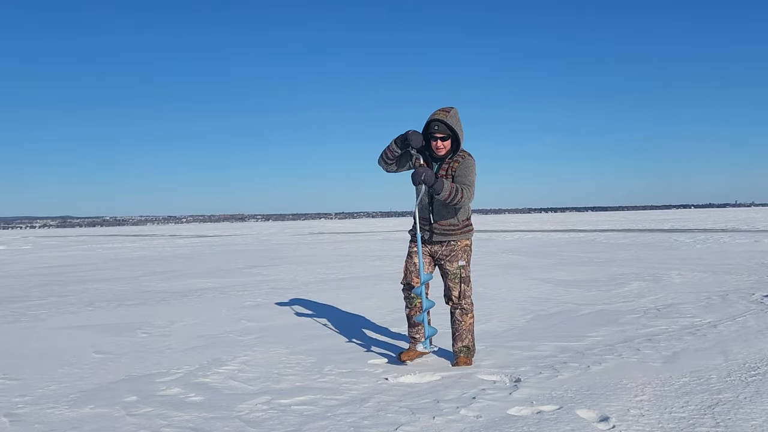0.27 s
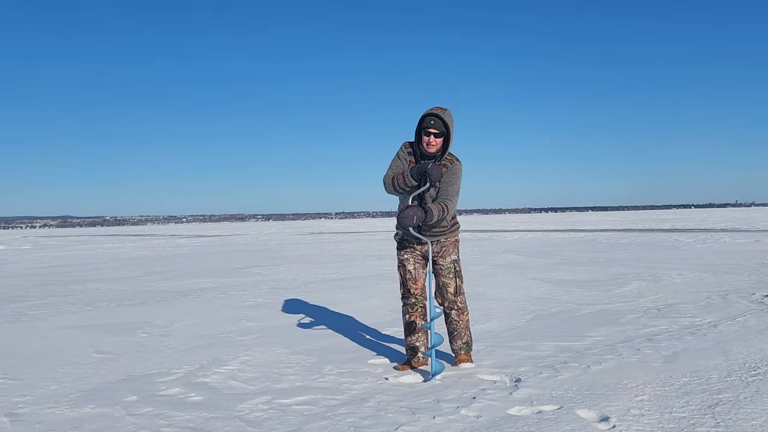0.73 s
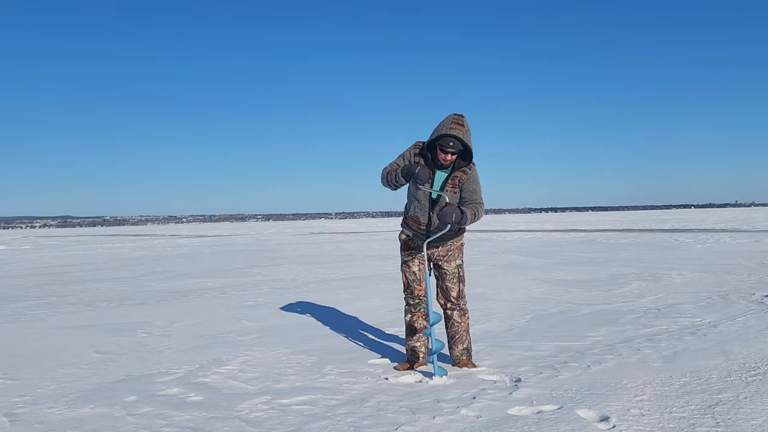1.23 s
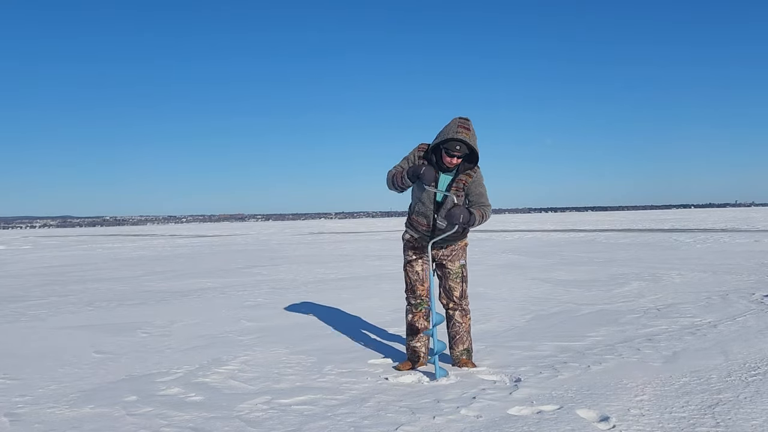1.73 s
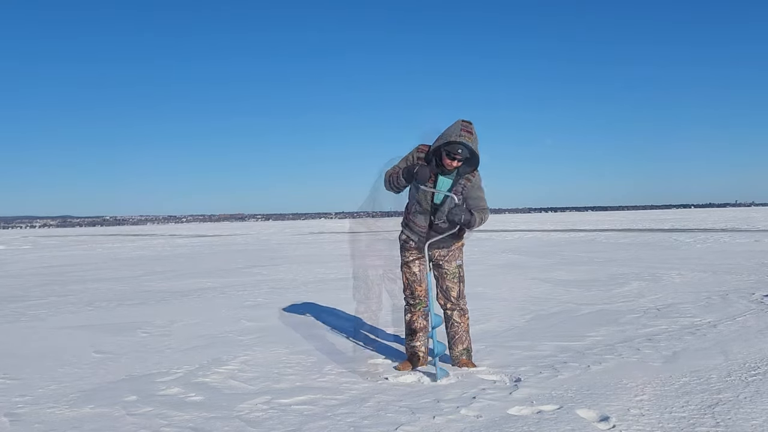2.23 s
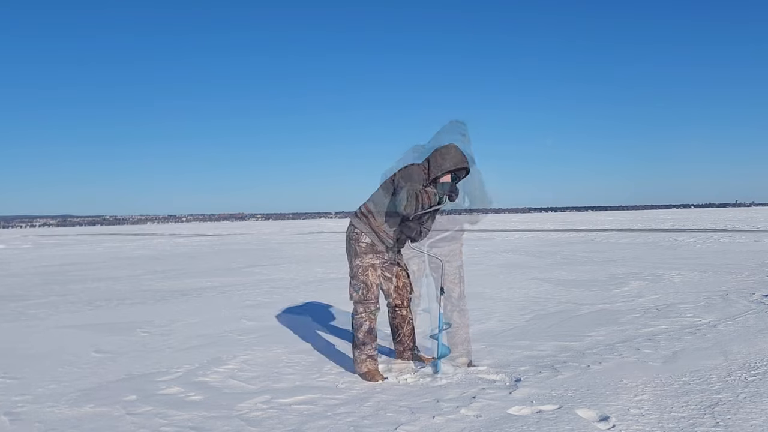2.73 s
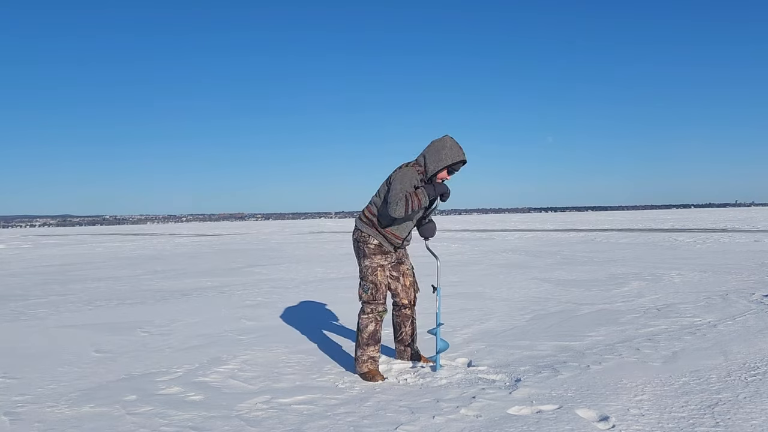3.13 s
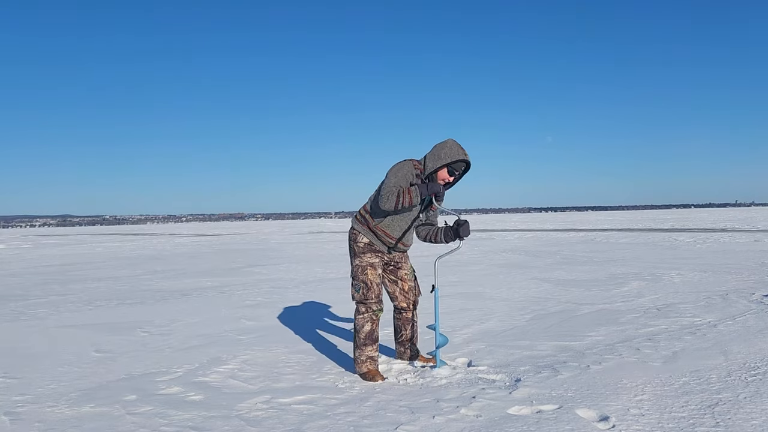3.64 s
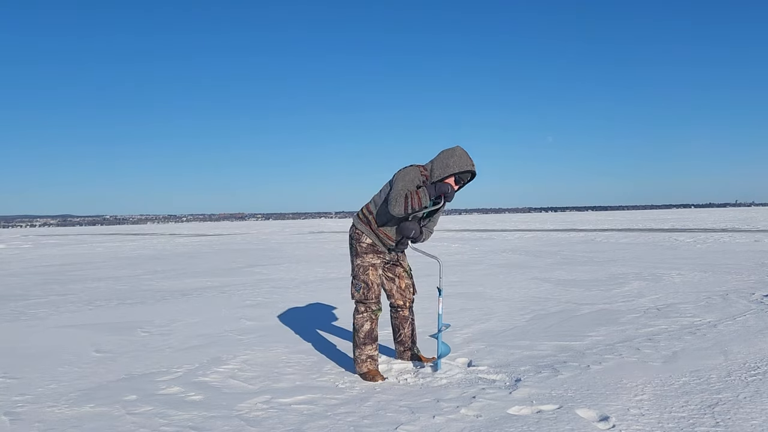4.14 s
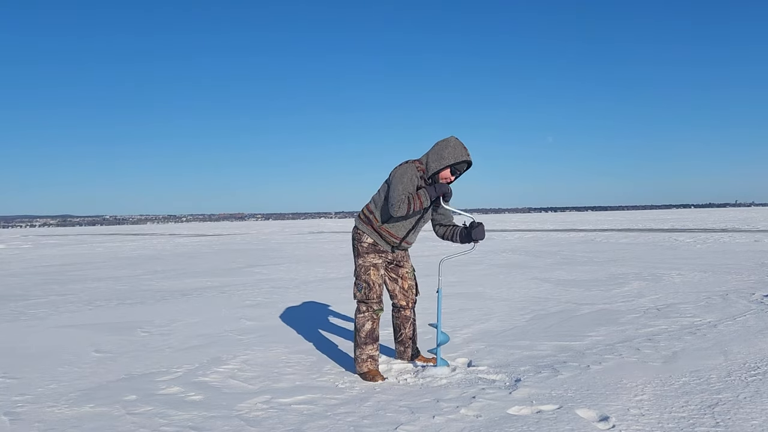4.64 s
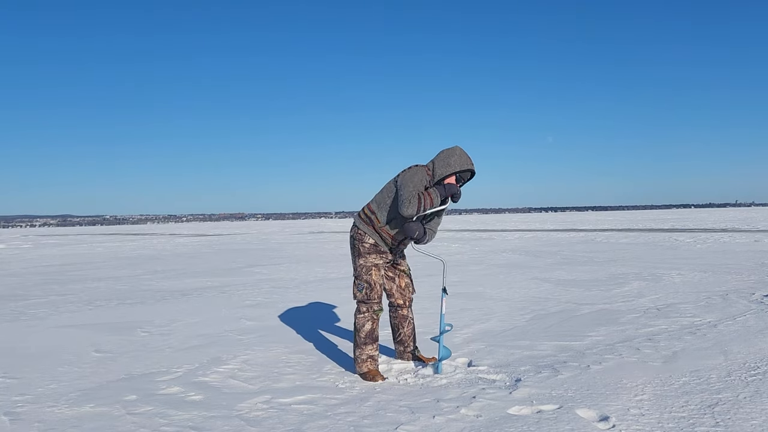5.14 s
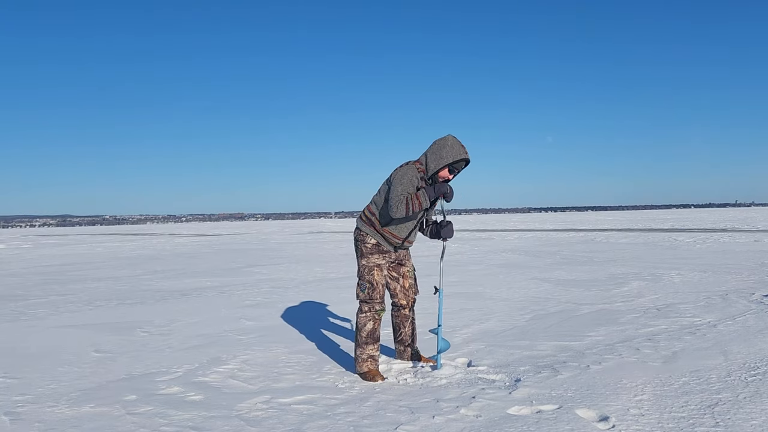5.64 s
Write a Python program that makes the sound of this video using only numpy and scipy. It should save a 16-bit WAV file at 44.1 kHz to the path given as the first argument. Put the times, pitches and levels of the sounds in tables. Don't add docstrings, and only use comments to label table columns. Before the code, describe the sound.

A hand auger scrapes and grinds into ice in uneven pushes, cracking sharply, while low wind gusts thump and flutter on the microphone.

```python
import sys
import numpy as np
from scipy import signal
from scipy.fft import rfft, irfft, next_fast_len
from scipy.io import wavfile
from scipy.ndimage import uniform_filter1d, map_coordinates

SR = 44100
rng = np.random.default_rng(int(sys.argv[2]) if len(sys.argv) > 2 else 0)


def log_audio(samples):
    frames = np.atleast_2d(samples).T
    limited = np.clip(frames, -1, 1)
    pcm = np.round(limited * 32767).astype(np.int16)
    wavfile.write(sys.argv[1], SR, pcm)


def attenuation_scalar(level_db):
    decades = np.asarray(level_db, float) / 20
    return 10 ** decades


N = 259308
TIME = np.arange(N) / SR
BURST_TIME = TIME[:SR // 10]


def unit(x):
    return x / np.sqrt(np.mean(x ** 2) + 1e-20)


def noise_pair():
    return rng.standard_normal((2, N))


def along(points, hz):
    f, v = np.transpose(points)
    return np.interp(np.log(hz + 1), np.log(f + 1), v)


def closed(points, hz):
    return attenuation_scalar(along(points, hz)) * (hz >= points[0][0]) * (hz <= points[-1][0])


def curves(rows):
    s, *columns = np.transpose(rows)
    return [np.interp(TIME, s, column) for column in columns]


def wobble(rate):
    knots = rng.standard_normal(int(N * rate / SR) + 4)
    return map_coordinates(knots, [TIME * rate])


def filtered(x, response):
    m = next_fast_len(N + SR // 2)
    return irfft(rfft(x, m) * response(np.fft.rfftfreq(m, 1 / SR)), m)[..., :N]


def coloured(x, spectrum):
    return filtered(x, lambda hz: closed(spectrum, hz))


# time_s, deep_share (0 to 1)
SCENE_CHANGE = [
    (2.3, 0.38),
    (2.6, 0.87),
]
# pitch_hz, width_hz, lift_db
BLADE_RING = [
    (7190, 30, 5),
]


def auger():
    hiss_db, grind_db, hollow_db = effort()
    chatter_db = 0.3 * wobble(14) + 0.8 * wobble(45) + 0.5 * wobble(160)
    bite = unit(attenuation_scalar(chatter_db) * (1 + 0.33 * chips(rate=180, spread_db=2.8, life_s=0.002)))
    judder = attenuation_scalar(0.6 * wobble(30))
    crack_hiss, crack_grind = cracks()
    deep_share = np.clip(curves(SCENE_CHANGE)[0], 0, 1)
    grind, hollow = grinding(deep_share)
    sound = shaving_hiss(deep_share) * (attenuation_scalar(hiss_db) * bite + crack_hiss)
    sound += grind * (attenuation_scalar(grind_db) * bite * judder + crack_grind)
    sound += hollow * (attenuation_scalar(hollow_db) * np.sqrt(bite) * judder + 0.21 * deep_share * crack_grind)
    return filtered(sound, lambda hz: steel(hz, BLADE_RING))


# peak_s, half_length_s, hiss_db, grind_over_hiss_db
SHALLOW_PUSHES = [(0.03, .06, -63, -4), (0.19, 0.052, -63, -4), (0.39, 0.027, -59.5, -2),
                  (0.43, 0.016, -45, -4), (0.5, 0.053, -58.5, -3), (0.62, 0.065, -82, 6),
                  (0.78, 0.081, -53, -6.5), (1.02, 0.099, -49.5, -4.5), (1.2, 0.14, -54, -5.5),
                  (1.47, .12, -45.5, -7.5), (1.72, 0.17, -51, -6.5), (1.93, 0.084, -47.5, -11.5),
                  (2.13, 0.15, -51, -4.5)]
# peak_s, half_length_s, hiss_db, grind_over_hiss_db, hollow_over_hiss_db
DEEP_HOLE_PUSHES = [(2.432, 0.043, -45.5, -2, -8.5), (2.574, 0.041, -52, -21, -0.5),
                    (2.647, 0.053, -43.5, -1, -15), (2.747, 0.046, -49, 0, -2),
                    (2.949, 0.055, -42, 1.5, -11), (3.045, 0.14, -48, -3.5, -9),
                    (3.443, 0.0099, -40, 3, -30), (3.56, 0.27, -44.5, -2.5, -9.5),
                    (3.73, 0.028, -41.5, -2.5, -7), (3.815, 0.028, -50.5, 6.5, 3),
                    (3.93, 0.058, -43.5, -1, -9), (4.114, 0.057, -50, -6, -12),
                    (4.192, 0.022, -48.5, 3, -8), (4.282, 0.089, -58.5, 4.5, -1.5),
                    (4.471, 0.052, -49.5, -4.5, -7), (4.659, 0.1, -46, -2.5, -7.5),
                    (4.84, 0.054, -43, -5, -9.5), (4.933, 0.057, -51.5, 5.5, -3.5),
                    (5.06, 0.062, -45, -0.5, -4.5), (5.189, 0.075, -42, -1, -12),
                    (5.354, 0.091, -56.5, -3, -3.5), (5.625, 0.067, -46.5, -4, -10.5),
                    (5.76, 0.061, -45, -3.5, -15), (5.88, 0.062, -44, 4, -6.5)]
# peak_s, half_length_s,
# hiss_db, grind_over_hiss_db, hollow_over_hiss_db
SLIPS = [
    (0.28, 0.09, -91, 10, 5),
    (3.17, 0.017, -68.5, -1, -11),
    (3.405, 0.0059, -79, -18, -5),
    (3.428, 0.0077, -69, -3, -1),
]
# stop_s, restart_s, drop_db
STICKS = [(0.219, 0.344, 39), (0.35, 0.368, 10), (0.54, 0.571, 20), (2.475, 2.534, 10.5),
          (2.768, 2.778, 20), (2.776, 2.88, 23), (2.879, 2.9, 20), (2.901, 2.917, 25), (3.051, 3.439, 40),
          (4.096, 4.172, 3), (4.75, 4.828, 2.5), (5.443, 5.463, 10), (5.466, 5.53, 25), (5.527, 5.558, 11)]


def effort():
    fade_s, catch_s = 0.044, 0.0041
    drop_db = np.zeros(N)
    for stop, restart, db in STICKS:
        stuck = np.minimum((TIME - stop) / fade_s, (restart - TIME) / catch_s)
        drop_db += db * np.clip(stuck, 0, 1)
    pushing = swells(SHALLOW_PUSHES + DEEP_HOLE_PUSHES) * attenuation_scalar(-2 * drop_db)
    return 10 * np.log10(pushing + swells(SLIPS))


def swells(rows):
    coarse = TIME[::16]
    power = np.full((3, len(coarse)), 1e-11)
    for s, half, db, grind_db, *hollow_db in rows:
        levels = db + np.array([0, grind_db, *(hollow_db or [-40])])
        power += attenuation_scalar(2 * levels)[:, None] * np.exp(-((coarse - s) / half) ** 2)
    return np.repeat(power, 16, axis=1)[:, :N]


def chips(rate, spread_db, life_s):
    chance, size = rng.random((2, N))
    sizes = (chance < rate / SR) * attenuation_scalar(-spread_db * np.log(size + 0.023))
    return signal.lfilter([1], [1, -np.exp(-1 / (life_s * SR))], sizes)


# start_s, peak_db, grind_over_hiss_db
ICE_CRACKS = [(0.0, -36, 4.5), (0.077, -59, 15), (0.3507, -45, -12), (0.42, -42, -11), (0.4305, -34, 4.5),
              (0.4486, -20.5, -5.5), (0.574, -51, -12), (0.627, -46, -19), (0.642, -59, -15),
              (2.414, -36, -6), (2.5344, -31.5, 5.5), (2.626, -32, -7), (2.669, -34, 11.5),
              (2.781, -32.5, 1.5), (2.881, -20.5, 0.5), (2.914, -31, 1), (2.898, -37, 7), (2.953, -32, 4),
              (2.959, -37, 6), (2.9875, -29, -17), (3.021, -25.5, 6.5), (2.81, -45, -19), (3.146, -63, 6),
              (3.399, -64, -21), (3.439, -32, -15), (3.444, -22.5, -4), (3.4438, -22, -9),
              (3.5642, -23, -4.5), (3.628, -38, 7), (3.729, -32, -3), (3.769, -46, 15), (3.824, -30, -4),
              (3.891, -37, -12), (3.905, -23.5, -3), (3.95, -43, 11), (4.162, -36, -4), (4.325, -38, 3),
              (4.31, -39, 3), (4.345, -42, 11.5), (4.38, -43.5, 12), (4.511, -39, -5), (4.566, -47, -6),
              (4.635, -32, -6), (4.7, -38, -8), (4.7236, -29, -1.5), (4.8272, -30, -10),
              (4.977, -20.5, -2.5), (4.982, -38, -7), (5.204, -33, 0), (5.307, -34, 0), (5.335, -43, -5),
              (5.4, -43, -1), (5.407, -48, 8), (5.436, -49, 8), (5.477, -52.5, 12), (5.533, -36.5, 3.5),
              (5.8425, -24.5, -3)]


def cracks():
    rise_s, hold_s, t60_s = 0.0011, 0.0016, 0.021
    t = BURST_TIME
    gain = np.zeros((2, N + len(t)))
    shape = np.clip(np.minimum(t / rise_s, attenuation_scalar(-60 * (t - hold_s) / t60_s)), 0, 1)
    for s, db, grind_db in ICE_CRACKS:
        start = round(s * SR)
        gain[:, start:start + len(t)] += attenuation_scalar([[db - 10.5], [db - 12.5 + grind_db]]) * shape
    return gain[:, :N]


# pitch_hz, level_db (per Hz)
SHALLOW_HISS = [(1710, -33), (2900, -13.5), (3400, -13), (4390, -6.5), (4870, -5), (5850, -8.5),
                (7630, -2.5), (8540, -6), (9490, -3), (10300, -11), (12400, -15.5), (14600, -10),
                (15500, -26)]
# pitch_hz, level_db (per Hz)
DEEP_HISS = [(1900, -27), (2700, -6), (3010, -8.5), (3500, -1), (4220, -5), (5700, -3.5), (6900, -4),
             (7200, -3.5), (8450, -4.5), (9780, -5.5), (10800, -14.5), (11900, -15), (14700, -12),
             (15500, -10.5)]
# time_s, pitch_hz, lift_db
HIGH_RESONANCE = [(2.55, 4070, 0.5), (2.6, 4150, 11.5), (2.64, 4280, 11), (2.7, 4580, 10.5), (2.8, 4270, 1),
                  (2.93, 4450, 10), (3.0, 4160, 0.5), (3.6, 4100, 4), (4.2, 4700, 3.5), (4.48, 4150, 3.5),
                  (4.77, 4600, 0), (4.85, 5100, 6.5), (4.95, 4300, 9.5), (5.09, 4330, 4.5), (5.88, 3950, 5)]
# time_s, pitch_hz, lift_db
ECHO_DIP = [
    (0.9, 3100, -5),
    (1.3, 2700, -7),
    (1.7, 2780, -6),
    (2.2, 3050, -7.5),
    (2.45, 3000, 0),
]


def shaving_hiss(deep_share):
    streaks = patchy(3.18, size=512, bins=2, frames=14)
    fine = filtered(ridge(streaks, (HIGH_RESONANCE, 380), (ECHO_DIP, 220)), steel)
    shallow = unit(filtered(fine, lambda hz: attenuation_scalar(along(SHALLOW_HISS, hz)) * (hz > 2000)))
    deep = unit(filtered(fine, lambda hz: attenuation_scalar(along(DEEP_HISS, hz)) * (hz > 2000)))
    return (1 - deep_share) * shallow + deep_share * deep


# time_s, pitch_hz, lift_db
BLADE_SONG = [(0.9, 1940, 1.5), (1.0, 2050, 8.5), (1.08, 1910, 13.5), (1.14, 2050, 17), (1.2, 2060, 9.5),
              (1.3, 1940, 2.5), (1.33, 1800, 15), (1.4, 2110, 15.5), (1.48, 1790, 9), (1.54, 1900, 2),
              (1.6, 1980, 17), (1.65, 2230, 11.5), (1.72, 1940, 9.5), (1.8, 2170, 13.5), (1.84, 1900, 0),
              (1.9, 2010, 17), (2.02, 1505, 4), (2.14, 2150, 8), (2.3, 1710, 0.5), (2.4, 1910, 5.5),
              (2.65, 1710, 3.5), (3.041, 1470, 4), (3.49, 1490, 6.5), (3.58, 1370, 6), (3.63, 1840, 7.5),
              (3.7, 1450, 0), (3.78, 1740, 8.5), (3.85, 1810, 3.5), (3.92, 1620, 3), (3.99, 1300, 5),
              (4.08, 1390, 4), (4.45, 1450, 9), (4.7, 1370, 2), (4.82, 1790, 4), (4.95, 1710, 4.5),
              (5.1, 2050, 4), (5.22, 2260, -3), (5.3, 1500, 6), (5.73, 1476, 10), (5.88, 1690, -13)]
# time_s, pitch_hz, lift_db
FLIGHT_SONG = [(0.9, 1700, 1), (1.1, 1400, 4), (1.3, 1750, 0.5), (1.45, 1590, 3), (1.58, 1460, 10),
               (1.64, 1400, -3), (1.78, 1265, 13.5), (1.9, 1520, -4), (1.96, 1400, 9), (2.08, 1470, 3.5),
               (2.2, 1300, 0), (2.5, 888, 4), (3.7, 870, -7), (3.78, 1000, 9), (3.86, 873, -2.5),
               (4.3, 860, -5), (4.75, 870, -17.5), (4.88, 835, 11), (5.1, 880, -2.5), (5.25, 1310, 3.5),
               (5.45, 1400, 3.5), (5.88, 900, -0.5)]
# pitch_hz, level_db (per Hz)
SHALLOW_GRIND = [(800, -25), (920, -26), (1000, -4.5), (1240, -10), (1400, -2), (1620, -7.5), (2040, -5.5),
                 (2450, -1.5), (2750, -10), (3100, -36)]
# pitch_hz, level_db (per Hz)
DEEP_GRIND = [(560, -50), (950, -5.5), (1150, -0.5), (1300, 1), (1700, -2.5), (1820, -1), (2080, 2),
              (3000, -11.5), (3900, -12), (6600, -120)]
# pitch_hz, level_db (per Hz)
HOLE_AIR = [(440, -18.5), (540, -7.5), (610, 2.5), (680, -1.5), (760, -8.5), (870, -1), (1000, -23.5),
            (1100, -20)]


def grinding(deep_share):
    rough = patchy(3.0, size=2048, bins=2, frames=5)
    rough = filtered(ridge(rough, (BLADE_SONG, 230), (FLIGHT_SONG, 110)), steel)
    shallow = unit(coloured(rough, SHALLOW_GRIND))
    deep = unit(coloured(rough, DEEP_GRIND))
    hollow = unit(coloured(0.82 * unit(rough) + 0.6 * noise_pair(), HOLE_AIR))
    return (1 - deep_share) * shallow + deep_share * deep, hollow


def patchy(depth_db, size, bins, frames):
    z = signal.stft(rng.standard_normal((2, N + size)), nperseg=size)[2]
    field = uniform_filter1d(rng.standard_normal(z.shape[1:]), bins, 0)
    field = uniform_filter1d(field, frames, 1)
    return unit(signal.istft(z * attenuation_scalar(depth_db * unit(field)), nperseg=size)[1][:, :N])


def ridge(pair, *tracks):
    hz, t, z = signal.stft(pair, SR, nperseg=1024)
    for track, width_hz in tracks:
        s, centre, lift_db = np.transpose(track)
        offset = (hz[:, None] - np.interp(t, s, centre)) / width_hz
        z = z * attenuation_scalar(np.interp(t, s, lift_db) * np.exp(-offset ** 2))
    return signal.istft(z, nperseg=1024)[1][:, :N]


# pitch_hz, width_hz, lift_db (over the ice)
STEEL_MODES = [(615, 110, 3), (800, 29, 4.5), (1400, 52, 1), (1710, 21, 6.5), (1940, 49, 1), (2280, 15, 2),
               (4360, 79, 3), (6900, 33, -3.5), (7820, 94, 5.5), (9700, 80, -2), (14400, 34, 3.5)]


def steel(hz, modes=STEEL_MODES):
    gain = np.ones(len(hz), complex)
    for centre, width, db in modes:
        damping = 1j * hz * width
        gain += (attenuation_scalar(db) - 1) * damping / (centre ** 2 - hz ** 2 + damping)
    return gain


# start_s, peak_db
SPLINTER_TICKS = [(0.3484, -64), (2.4138, -16.5), (2.455, -44), (2.6266, -39), (2.883, -41), (3.447, -42),
                  (3.4891, -42), (4.7233, -37), (4.855, -31), (5.1294, -26), (5.5729, -35), (5.8263, -32),
                  (5.8413, -44)]
# pitch_hz, level_db (per Hz)
SPLINTER_COLOUR = [(5500, -35), (7500, 4.5), (9000, 6), (11000, -11), (13000, -10), (16400, -5)]


def ticks():
    t60_s, rise_s = 0.012, 0.0006
    t = BURST_TIME
    gain = np.zeros(N + len(t))
    for s, db in SPLINTER_TICKS:
        start = round(s * SR)
        gain[start:start + len(t)] += attenuation_scalar(db - 9.5 - 60 * t / t60_s) * np.minimum(t / rise_s, 1)
    return gain[:N] * unit(coloured(noise_pair(), SPLINTER_COLOUR))


# start_s, peak_db, pitch_hz
STEEL_PINGS = [(0.349, -62, 1560), (0.349, -58, 3600), (0.378, -58, 1960), (0.378, -51, 3700),
               (3.567, -39, 1830), (0.431, -37, 1345), (0.453, -40, 1940), (0.452, -45, 1350),
               (0.45, -27.5, 4700), (2.535, -48, 2000), (2.668, -44, 1500), (2.955, -36, 1530),
               (2.986, -42, 3980), (3.02, -33.5, 1400), (3.441, -36, 1400), (3.443, -45, 1916),
               (3.735, -38, 1340), (3.905, -35.5, 1560), (3.945, -36, 1670), (4.83, -46, 4900),
               (4.976, -36, 4100), (4.977, -42, 1970), (5.203, -37.5, 1400), (5.203, -46, 4600),
               (5.25, -36, 1400)]


def pings():
    cycles, rise_s, spacing = 74, 0.00072, 0.046
    t = BURST_TIME
    out = np.zeros((2, N + len(t)))
    phases = rng.random((len(STEEL_PINGS), 2, 2, 1))
    for (s, db, hz), turn in zip(STEEL_PINGS, phases):
        detune = np.array([[1 - spacing / 2], [1 + spacing / 2]])
        modes = np.sin(2 * np.pi * (hz * t * detune + turn)) * [[1], [.6]]
        fade = attenuation_scalar(db - 60 * t * hz / cycles) * (1 - np.exp(-t / rise_s))
        start = round(s * SR)
        out[:, start:start + len(t)] += fade * modes.sum(axis=1)
    return out[:, :N]


# pitch_hz, lead_radians
PORT_LEAD = [(0, 0), (2840, .1), (3200, -.9), (4600, -.7), (6300, -1.9), (7800, -1.4), (9750, -1.35),
             (10200, -2), (11300, -2), (12300, -3.5), (16200, -3.4)]
# pitch_hz, left_over_right_db
BODY_SHADE = [(300, -0.5), (1300, -2.5), (2500, -3), (3000, 7.5), (3600, -1), (6000, -2), (8000, -6.5),
              (9300, 4), (10300, 6.5), (11500, 13), (12500, -2.5), (15000, 4.5)]
# pitch_hz, likeness (0 to 1)
PORT_LIKENESS = [(500, .96), (2600, .96), (3000, .62), (3600, .8), (6000, .72), (10000, .68), (12000, .55),
                 (15000, .64)]


def ports(pair):
    def shares(hz):
        angle = np.arccos(np.clip(along(PORT_LIKENESS, hz), 0, 1)) / 2
        return np.array([np.cos(angle), np.sin(angle)])

    def body(hz):
        half = attenuation_scalar(along(BODY_SHADE, hz) / 2) * np.exp(.5j * along(PORT_LEAD, hz))
        return np.array([half, 1 / half])

    direct, scatter = filtered(pair, shares)
    return filtered(np.array([direct + scatter, direct - scatter]), body)


# time_s, strength_db, harshness_db
EDDIES = [(0.0, -37, 0.5), (0.21, -45.5, 7), (0.52, -42, 5.5), (0.8, -39.5, -1.5), (1.36, -38, 0.5),
          (1.7, -47, 1), (1.85, -38, -1), (2.3, -39, 2), (2.82, -50, 6), (3.0, -44.5, 4),
          (3.14, -45.5, -17), (3.39, -49, -3), (4.1, -42, 0), (4.52, -55, -1.5), (4.75, -53.5, 3),
          (5.3, -47.5, 1.5), (5.65, -40.5, 2.5), (5.8, -50.5, -1)]
# pitch_hz, level_db (per Hz)
BUFFET_COLOUR = [(8.8, -43), (15, -3), (54, 4), (81, 5.5), (130, -8.5), (170, -54.5), (290, -120)]
# pitch_hz, level_db (per Hz)
FLUTTER_COLOUR = [(90, 2), (115, 6), (170, 2.5), (250, -8.5), (320, -22.5), (420, -40)]
# pitch_hz, level_db (per Hz)
RASP_COLOUR = [(200, -16), (250, -2), (320, -2.5), (370, -7), (500, -14), (700, -19.5), (1400, -33.5),
               (2400, -41.5), (3600, -49)]
# pitch_hz, level_db (per Hz)
SPIT_COLOUR = [(400, -2), (500, -4), (900, -14), (1200, -26), (1600, -32)]


def wind():
    thump, sway, lift_db = thumps()
    puff, spits = puffs()
    strength_db, harsh_db = curves(EDDIES)
    strength_db = strength_db + lift_db
    flutter_db = strength_db - 0.5
    rasp_db = -61 + strength_db - strength_db.mean() + harsh_db
    eddy = wobble(16)
    buffet = thump + sway * gusts(BUFFET_COLOUR, 0.64, 0.39 * wobble(31))
    flutter = attenuation_scalar(flutter_db) * gusts(FLUTTER_COLOUR, 0.47, 1.6 * eddy + 2 * wobble(25))
    rasp = (attenuation_scalar(rasp_db + 2.8 * eddy) + puff) * gusts(RASP_COLOUR, 0.22, 1.9 * wobble(40))
    return buffet + flutter + rasp + spits * gusts(SPIT_COLOUR, 0.2, 0.95 * wobble(42.7))


def gusts(spectrum, alike, lumps_db):
    mid, side = coloured(noise_pair(), spectrum) * attenuation_scalar(lumps_db)
    ratio = np.sqrt((1 - alike) / (1 + alike))
    return np.array([mid + ratio * side, mid - ratio * side]) / np.std(mid)


# peak_s, thump_db, pitch_hz, eddy_lift_db
GUST_THUMPS = [(0.09, -30.5, 49.4, -1.5), (0.125, -40.5, 163, -0.5), (0.144, -36.5, 68, -1),
               (0.227, -33.5, 65, -1), (0.309, -37.5, 221, -5), (0.318, -33.5, 86.5, 1.5),
               (0.445, -28.5, 149, 9.5), (0.576, -36, 188, -5), (0.65, -32.5, 62, 2.5),
               (0.787, -36.5, 163, 6.5), (0.87, -43, 166, 5), (0.875, -32.5, 77.5, -2.5),
               (1.091, -34.5, 219, 0), (1.234, -45, 150, 2), (1.329, -29.5, 78, -1.5),
               (1.381, -39, 173, 6.5), (1.389, -27.5, 59.3, -3.5), (1.501, -35, 142, 3),
               (1.636, -34, 148.4, 5), (1.771, -32.5, 58, -0.5), (1.843, -30, 188, -1.5),
               (1.853, -35, 55, -5), (2.001, -41.5, 80, 0), (2.094, -36.5, 170, 0), (2.111, -31.5, 87, -4),
               (2.184, -40.5, 150, -0.5), (2.245, -31.5, 96, 0.5), (2.698, -35, 71, -1),
               (2.911, -29, 50.5, 10), (3.075, -38.5, 70, -9), (3.24, -31, 76, 5), (3.364, -31, 61.3, -8),
               (3.482, -28, 54.6, 1), (3.624, -30, 61.4, 1), (3.711, -35, 71.6, 2), (3.962, -29, 67, -1),
               (4.052, -35.5, 64, -0.5), (4.148, -32, 75, -1), (4.305, -36.5, 94, 7),
               (4.912, -38, 76.5, 8.5), (4.995, -37.5, 84.6, 4.5), (5.069, -43, 179, 10),
               (5.27, -34.5, 81.6, 2), (5.514, -32, 98, 3), (5.554, -39.5, 144, 2.5), (5.57, -33, 82, 2.5),
               (5.649, -34, 138, -4), (5.766, -35, 76, 1), (5.863, -33.5, 76, 3)]


def thumps():
    half_s, sway_db, lull_db = 0.019, -8, -41.5
    s, db, hz, lift_db = np.transpose(GUST_THUMPS)
    coarse = TIME[::8]
    lag, chance = coarse - s[:, None], rng.random((len(s), 2))
    bells = np.exp(-(lag / half_s) ** 2)
    phase = 2 * np.pi * (hz[:, None] * lag + chance[:, :1])
    skew = (0.0035 * hz * np.sign(chance[:, 1] - .5))[:, None]
    left = attenuation_scalar(db) @ (bells * np.sqrt(2) * np.sin(phase + skew))
    right = attenuation_scalar(db) @ (bells * np.sqrt(2) * np.sin(phase - skew))
    sway = np.sqrt(attenuation_scalar(2 * lull_db) + attenuation_scalar(2 * (db + sway_db)) @ bells)
    left, right, sway, lift = (np.interp(TIME, coarse, c) for c in (left, right, sway, lift_db @ bells))
    return np.array([left, right]), sway, lift


# start_s, peak_db, spit_over_puff_db
WIND_PUFFS = [(0.009, -38, -19), (0.271, -50, -13), (0.311, -38, -19), (0.521, -49, 6), (0.565, -38, 0.5),
              (0.575, -47, 0), (0.587, -37, 6.5), (0.74, -30.5, -21), (0.859, -42, -22),
              (1.085, -30.5, -22), (1.378, -33, -18), (1.413, -33, -25), (1.454, -38, -7), (1.744, -49, 2),
              (2.239, -45.5, 9), (2.9, -41, -15), (5.505, -40, -7), (5.539, -41, -15)]


def puffs():
    t = BURST_TIME
    gain = np.zeros((2, N + len(t)))
    bump = np.exp(-((t - .036) / 0.013) ** 2)
    for s, db, spit_db in WIND_PUFFS:
        start = round(s * SR)
        levels = attenuation_scalar([[db - 13.5], [db - 13.5 + spit_db]])
        gain[:, start:start + len(t)] += levels * [bump, bump ** 2]
    lead = round(.03 * SR)
    return gain[:, lead:N + lead]


# peak_s, half_length_s, level_db
SNOW_BRUSHES = [
    (.08, 0.11, -74),
    (0.76, 0.073, -59),
]


def snow():
    fizz = unit(coloured(noise_pair(), [(8000, -17), (12000, -5), (15800, 3)]))
    return sum(attenuation_scalar(db) * np.exp(-((TIME - s) / half) ** 2) for s, half, db in SNOW_BRUSHES) * fizz


# pitch_hz, level_db (per Hz)
AIR_COLOUR = [(300, -13), (600, -5), (1500, -5), (2000, -14), (2350, -9), (2800, -20), (4500, -22),
              (7500, -20), (9600, -20), (9900, -41)]


def air():
    return attenuation_scalar(-83.0) * unit(coloured(noise_pair(), AIR_COLOUR))


def scene():
    return ports(auger() + ticks() + pings()) + wind() + snow() + air()


def roll_off(x):
    return signal.sosfilt(signal.butter(12, 16660, fs=SR, output="sos"), x)


# pitch_hz, level_db
BAND_LIMIT = [(0, 0), (15750, 0), (15950, -30)]


def record(dry):
    ceiling = 0.16
    soft = dry / (1 + abs(dry / ceiling) ** 4) ** .25
    return roll_off(coloured(soft, BAND_LIMIT))


dry = scene()
out = record(dry)
log_audio(out)
```